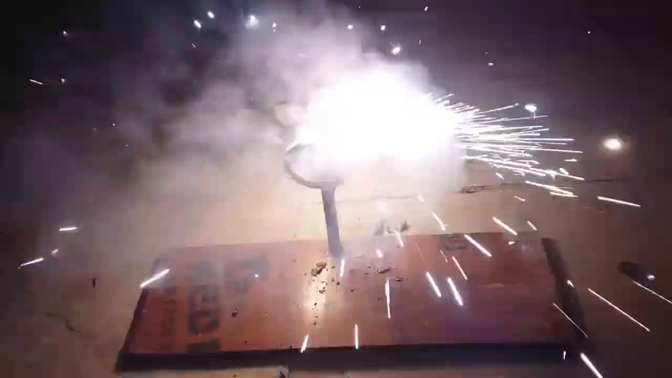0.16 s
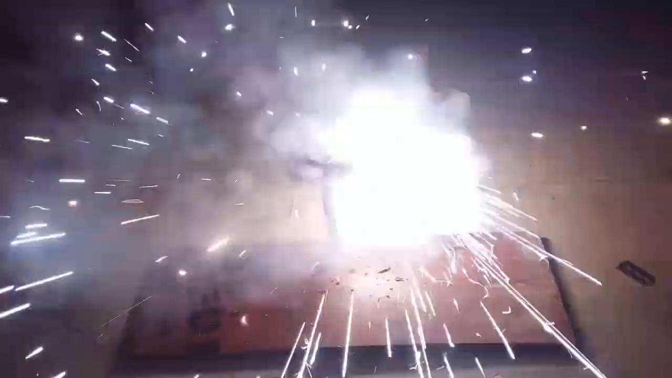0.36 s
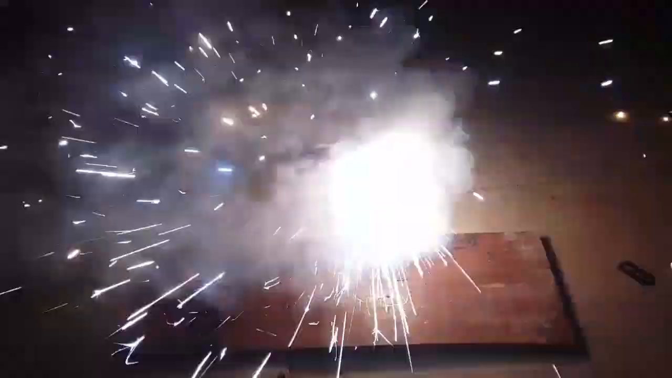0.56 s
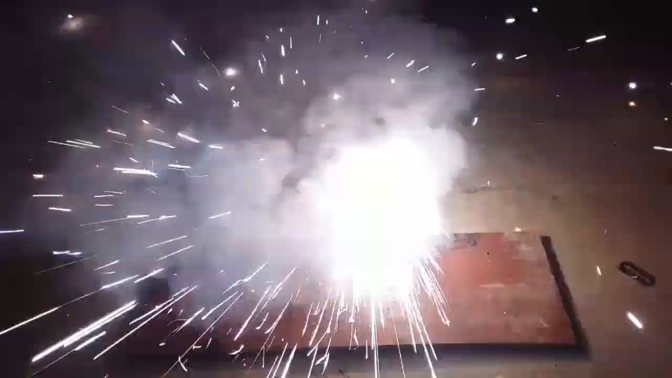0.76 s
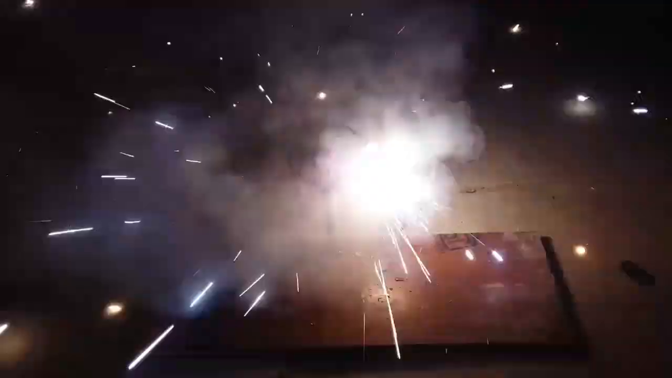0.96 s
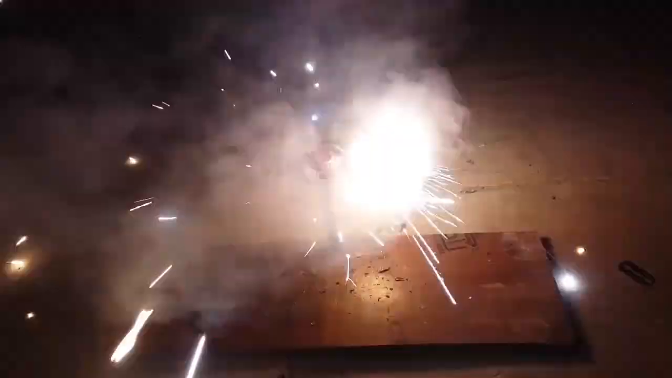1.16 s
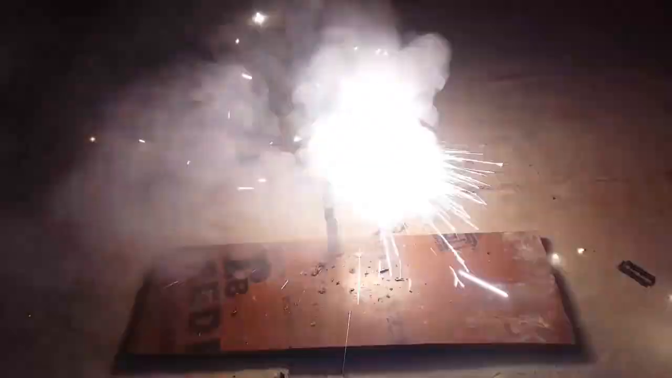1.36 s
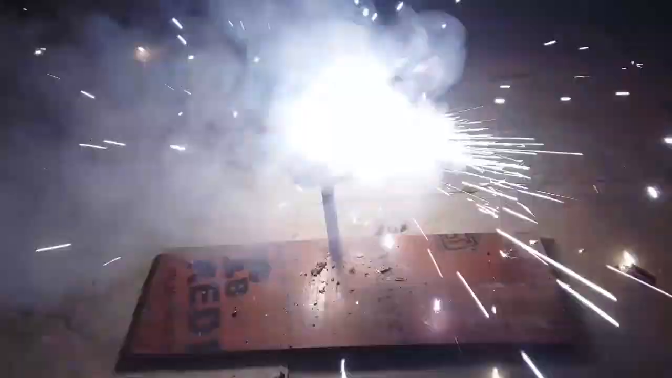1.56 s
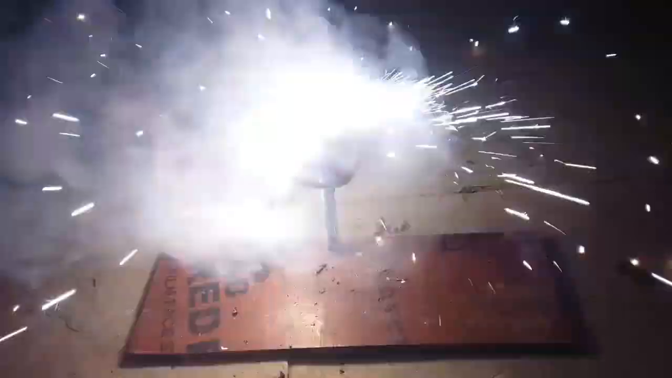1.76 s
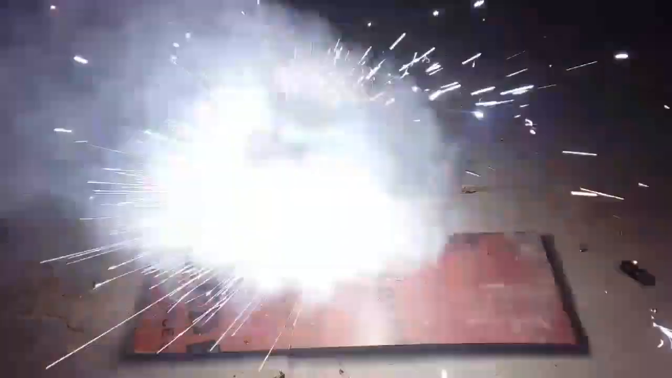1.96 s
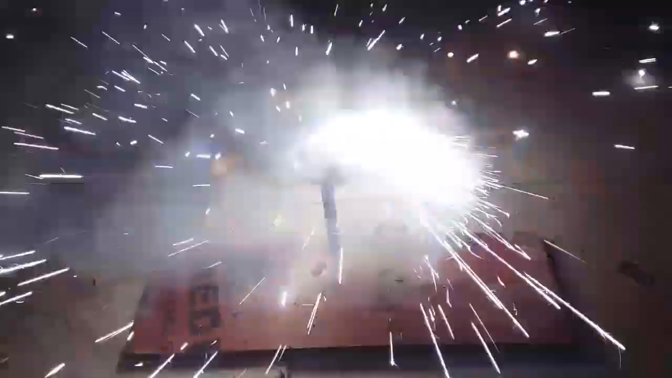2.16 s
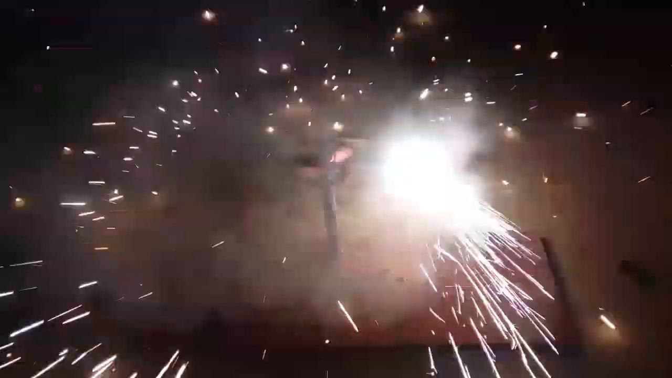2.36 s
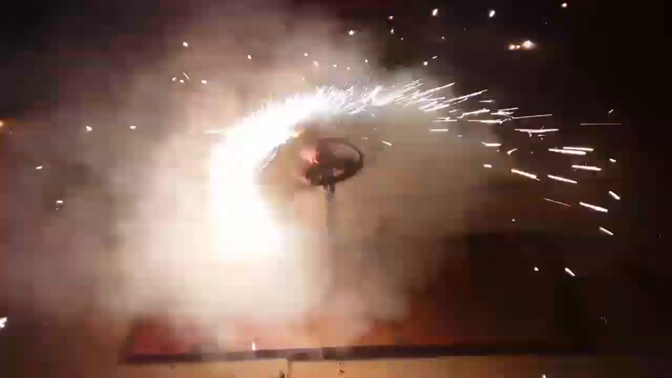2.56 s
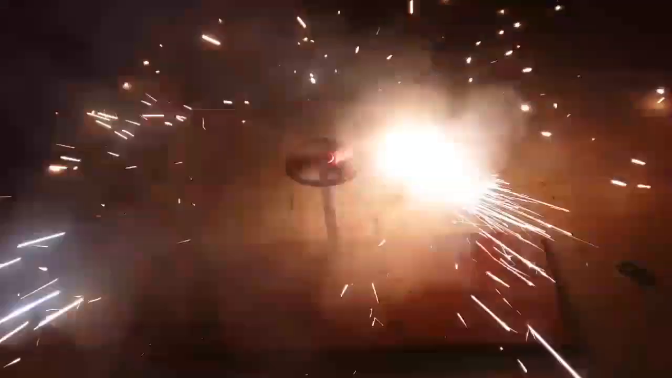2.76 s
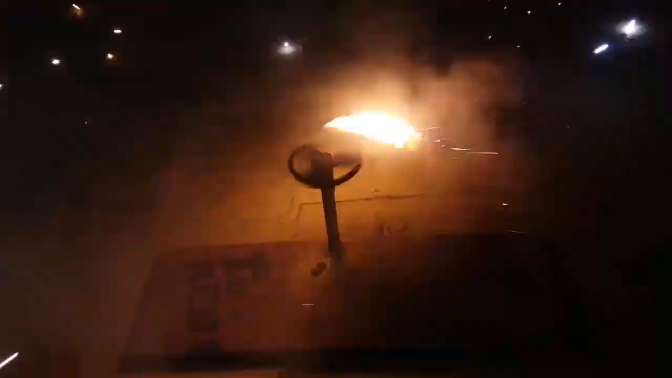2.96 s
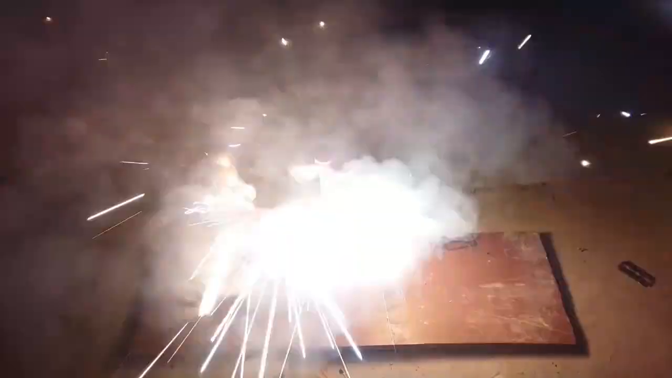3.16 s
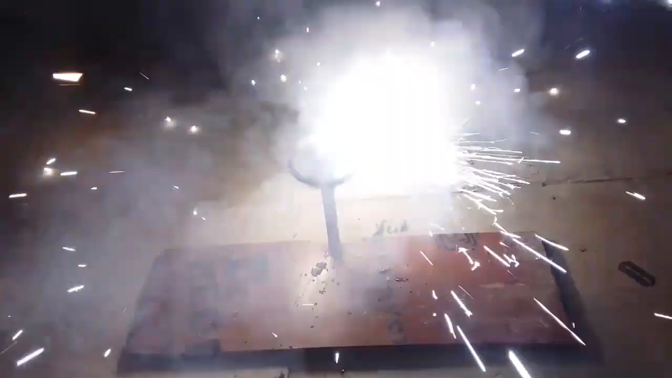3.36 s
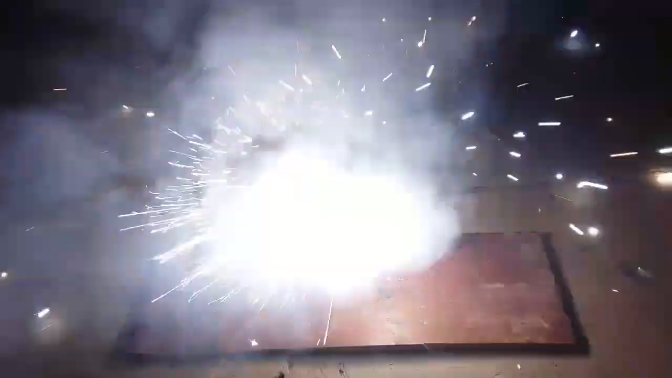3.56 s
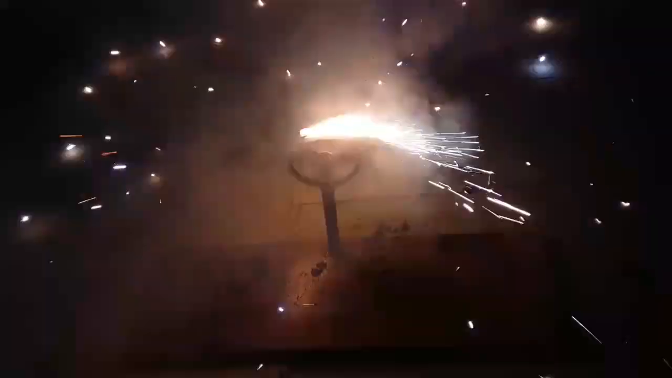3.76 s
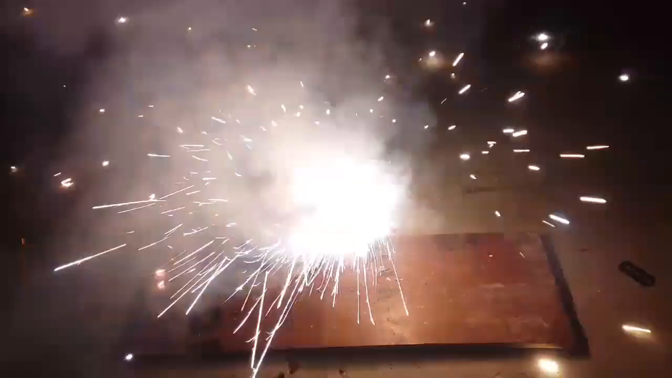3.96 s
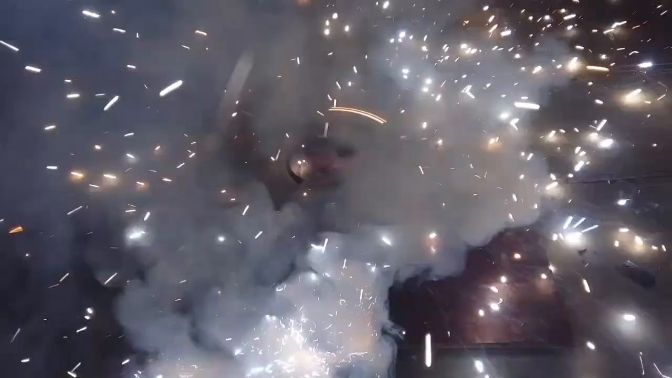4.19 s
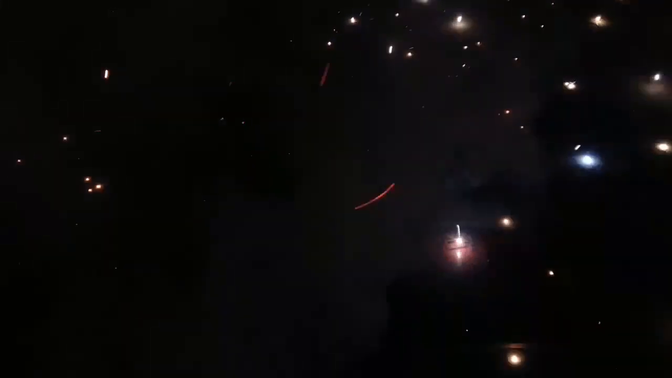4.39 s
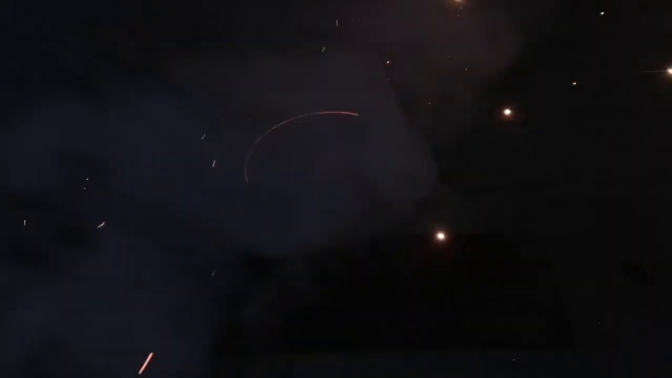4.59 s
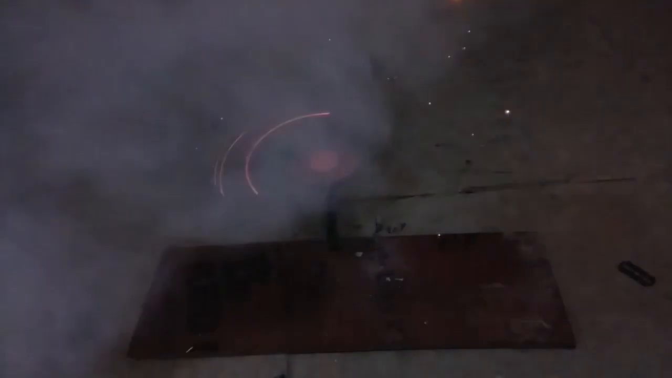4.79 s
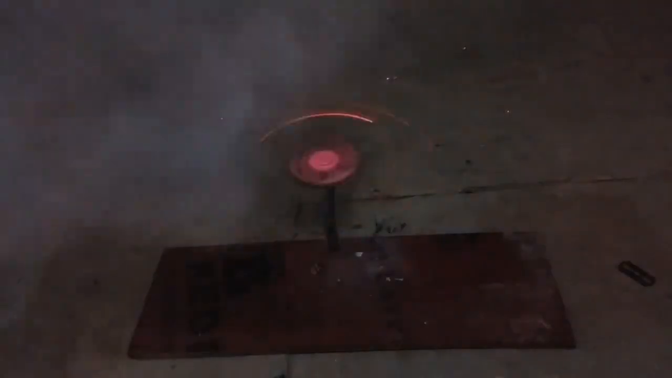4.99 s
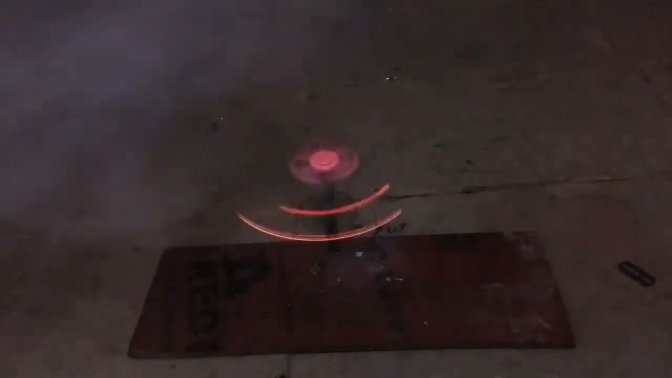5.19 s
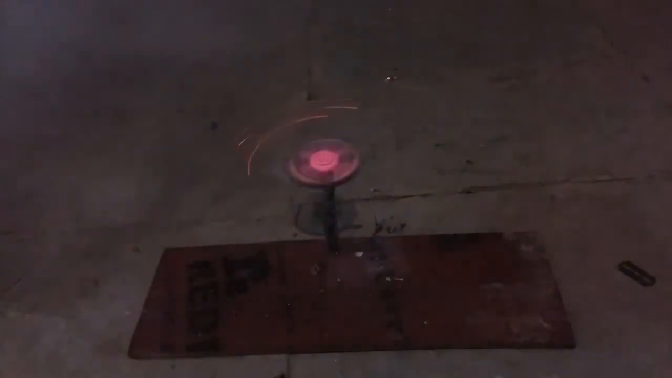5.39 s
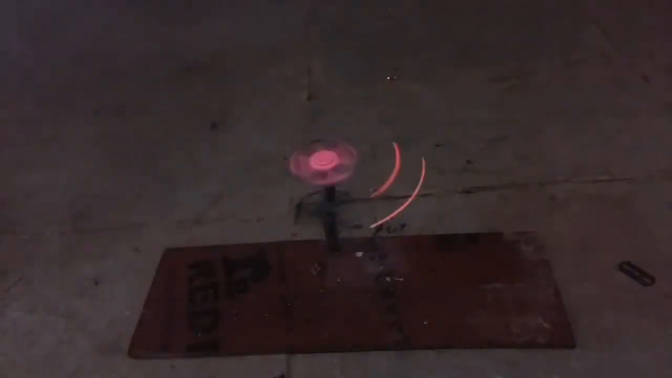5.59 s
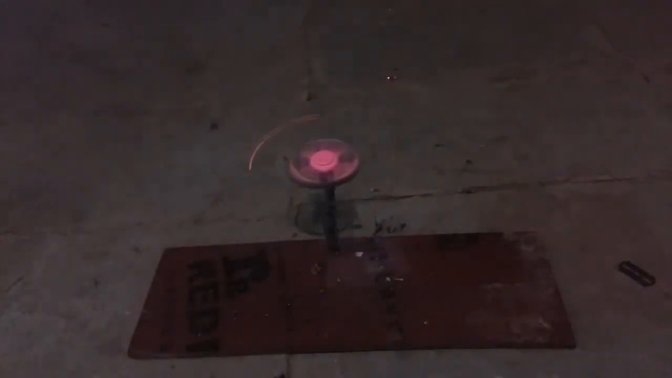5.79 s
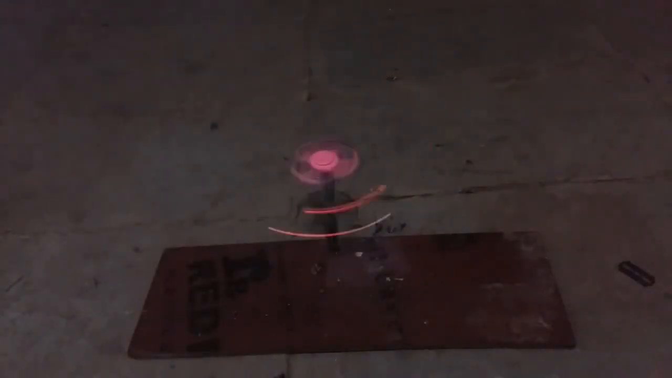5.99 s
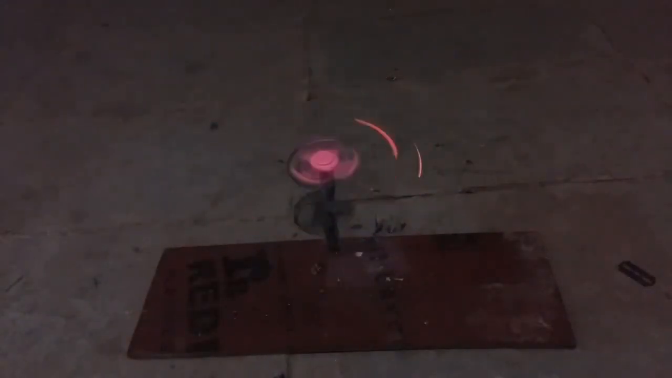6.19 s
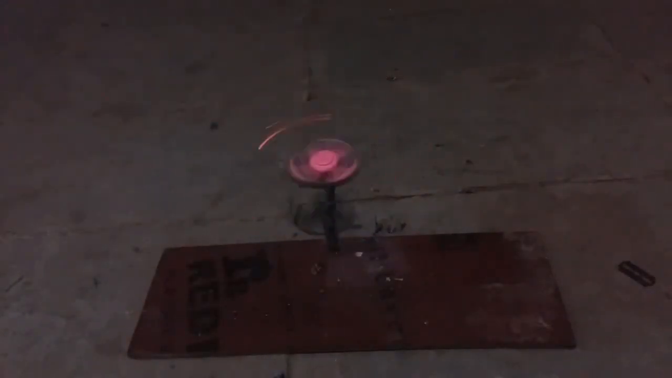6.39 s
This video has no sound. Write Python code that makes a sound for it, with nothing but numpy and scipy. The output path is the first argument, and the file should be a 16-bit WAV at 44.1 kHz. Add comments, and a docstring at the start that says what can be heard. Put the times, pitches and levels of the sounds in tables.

```python
"""A jet of fire roars and hisses, swaying left and right, as a wheel firework spins on a short post over a
board at night. The board's echo sweeps once a turn, and sparks snap as tiny bursts of bright noise. The charge
ends in a pop and a bang, made of pressure pulses and torn gas among hard walls. The wheel coasts on with a
whirr of coloured noise, and the camera's gain control slowly lifts the quiet night."""
import sys
import numpy as np
from scipy import signal
from scipy.fft import rfft, irfft, next_fast_len
from scipy.io import wavfile
from scipy.ndimage import uniform_filter1d, minimum_filter1d, map_coordinates

SR = 44100
rng = np.random.default_rng(int(sys.argv[2]) if len(sys.argv) > 2 else 0)


def inscribe(sig):
    """Save sig as 16-bit PCM at rate SR to the path in sys.argv[1].

    A 1-D sig is mono; a 2-D sig holds one channel per row.
    Samples are clipped to [-1, 1] before scaling.
    """
    pcm = np.round(np.clip(np.atleast_2d(sig).T, -1, 1) * 32767)
    wavfile.write(sys.argv[1], SR, pcm.astype(np.int16))


N = 284004


def amp(db):
    """Gain of a level in dB."""
    return 10 ** (np.asarray(db) / 20)


def unit(x):
    """Scale x to an rms of 1."""
    return x / np.sqrt(np.mean(x ** 2) + 1e-20)


def along(points, hz):
    """Read a curve of (Hz, value) points on a log frequency axis."""
    f, v = np.transpose(points)
    return np.interp(np.log(hz + 1), np.log(f + 1), v)


def curves(rows):
    """One value per sample for each column after the time."""
    s, *cols = np.transpose(rows)
    return [np.interp(np.arange(N) / SR, s, c) for c in cols]


def wobble(rate):
    """A smooth random curve with rate random knots a second."""
    knots = rng.standard_normal(int(N * rate / SR) + 4)
    return map_coordinates(knots, [np.arange(N) * rate / SR])


def filtered(x, response):
    """Filter x by a response, real or complex, that depends on frequency."""
    m = next_fast_len(N + SR // 8)
    return irfft(rfft(x, m) * response(np.fft.rfftfreq(m, 1 / SR)), m)[..., :N]


def delayed(pair, lags):
    """Read each side of a stereo pair late by its own lag in samples; a negative lag reads it early."""
    return np.array([map_coordinates(side, [np.arange(N) - lag], mode="nearest")
                     for side, lag in zip(pair, lags)])


def spread(hz, alike):
    """Weights of the shared and the opposed noise that give a wanted left-right likeness."""
    turn = np.arccos(np.clip(along(alike, hz), -1, 1)) / 2
    return np.array([np.cos(turn), np.sin(turn)])


def smooth_field(shape, bins, frames):
    """Random patches over frequency and time, averaged over some bins and frames, with rms 1."""
    field = uniform_filter1d(rng.standard_normal(shape), size=bins, axis=0)
    return unit(uniform_filter1d(field, size=frames, axis=1))


def rush(colour, patchy_db):
    """Rushing gas or air: coloured stereo noise of rms 1 with patches of random gain."""
    # How alike left and right are for near sources: hz, likeness (0 to 1)
    near_alike = [(30, .995), (170, .99), (350, .98), (700, .95), (1400, .93), (2800, .82), (5600, .68),
                  (7000, .37), (10000, .28)]
    z = signal.stft(rng.standard_normal((2, N)), nperseg=512)[2]
    patches = amp(patchy_db * smooth_field(z.shape[1:], bins=6, frames=6))
    pair = signal.istft(z * patches, nperseg=512)[1][:, :N]
    mid, side = filtered(pair, lambda hz: amp(along(colour, hz)) * spread(hz, near_alike))
    return unit(np.array([mid + side, mid - side]))


def burn():
    """One strength drives the jet: a harder burn hisses louder, roars more and sounds brighter."""
    # Fresh powder catches fast, then the burn sags: start_s, hiss_db
    burn_curve = [(0, -27.5), (.04, -25), (.2, -29), (.3, -24.5), (.66, -26.5), (.95, -27), (1.349, -31),
                  (1.41, -28), (1.5, -29.5), (1.59, -23.5), (1.88, -24.5), (2.01, -28.5), (2.12, -23),
                  (2.45, -22.5), (2.68, -25), (3.0, -23), (3.12, -32), (3.22, -28.5), (3.298, -29),
                  (3.318, -24), (3.69, -24), (3.88, -28), (3.93, -33), (4.02, -26.5), (4.05, -24),
                  (4.2, -24.5)]
    # Short spurts of the flame: middle_s, rise_db over the burn
    flares = [(.39, 1.5), (.61, 1), (.84, 2), (.92, 2), (1.1, 2), (2.94, 1.5), (3.015, 4.5), (3.168, 5.5),
              (3.25, 1.5), (3.33, 1), (4.13, 2.5)]
    # Slow level of the roar at the mean burn: start_s, level_db
    roar_level = [(0, -33), (.5, -30.5), (1.1, -31), (1.6, -32), (2.4, -27.5), (2.9, -33.5), (3.3, -30.5),
                  (3.7, -32.5), (4.2, -31)]
    flare_s = .015  # half width of a spurt
    roar_follows, bright_grows = 0.79, 0.75  # dB of roar and of extra treble per dB of burn
    bright_db = 2  # extra treble at the mean burn
    t = np.arange(N) / SR
    spurts_db = sum(db * np.exp(-((t - s) / flare_s) ** 2) for s, db in flares)
    hiss_db = curves(burn_curve)[0] + spurts_db
    surge_db = hiss_db - np.mean(np.transpose(burn_curve)[1])
    roar_db = curves(roar_level)[0] + roar_follows * surge_db
    return hiss_db, roar_db, bright_db + bright_grows * surge_db


def jet_hiss(angle, sputter, bright_db):
    """Gas hisses from the nozzle: loudest when it points this way, with a treble that flickers more."""
    # Colour of the hiss: hz, level_db per Hz
    hiss_colour = [(400, -43), (700, 0), (1000, 3.5), (1600, -1), (2100, -2.5), (2400, -3), (2800, -3.5),
                   (3300, -8), (3900, -4), (4600, -6.5), (5400, -6.5), (5900, -12.5), (6400, -18),
                   (8500, -23.5), (11000, -35), (15800, -62)]
    spurts = 3 * np.clip(wobble(90) - 1, 0, None)
    hiss = rush(hiss_colour, patchy_db=1.8) * amp(.45 * sputter + 1.3 * wobble(160) + spurts)
    beam_db = .7 * np.cos(angle + .45) + .7 * np.cos(2 * angle + 1.9)
    bright = filtered(hiss, lambda hz: 1 / (1 + (2600 / (hz + 1)) ** 3))
    body = amp(beam_db) * (hiss - bright)
    return body + amp(.4 * beam_db + bright_db + .8 * wobble(40)) * bright


def board_echo(hiss, angle):
    """The board below returns the hiss a little later and duller; the delay sweeps once a turn."""
    lag_ms = .605 + .062 * np.cos(angle + [[.6], [.45]])  # longer as the nozzle comes near
    bounce = delayed(hiss, lag_ms * SR / 1000)
    return filtered(bounce, lambda hz: .5 / (1 + (hz / 4300) ** 4))


def spark_fizz(angle, hiss_db):
    """Sparks burn out in the air: crackling treble noise that swells once a turn and follows the burn."""
    # Colour of the fizz: hz, level_db per Hz
    fizz_colour = [(5000, -28.5), (7500, -7.5), (9500, -1), (12000, -6), (15800, -11.5)]
    swing_db, follows = 6, 0.59  # swell over a turn; dB of fizz per dB of burn
    crackle = amp(2.5 * wobble(400) + 1.5 * wobble(12))
    turn_swell = np.cos(angle + .6) + 0.37 * np.cos(2 * angle + 3.2)
    crackle *= amp(swing_db * turn_swell + follows * hiss_db)
    return amp(-50.5) * unit(crackle * rush(fizz_colour, patchy_db=0.5))


def sway(flame, angle):
    """As the nozzle circles, the flame sways between the ears in both arrival time and loudness."""
    swing_us, swing_db, leftmost_turn = 46, .7, .66  # time sway, level sway, turn where it stands leftmost
    left = (.2 + np.cos(angle - 2 * np.pi * leftmost_turn)) * [[.5], [-.5]]
    return amp(swing_db * left) * delayed(flame, -left * swing_us * SR / 1e6)


def jet():
    """Uneven burning from a circling nozzle: hiss, board echo, roar, rumble and fizz near a wall."""
    # Speed of the wheel: start_s, speed in turns a second
    spin = [(0, 8.676), (.4, 8.694), (1, 10.503), (1.7, 10.56), (2.3, 11.963), (3, 13.173), (4.2, 11.684)]
    # Colour of the roar: hz, level_db per Hz
    roar_colour = [(40, -52), (100, -25), (165, 6), (210, 2.5), (280, 2.5), (550, 0), (900, -12.5),
                   (1500, -32.5)]
    # Colour of the rumble: hz, level_db per Hz
    rumble_colour = [(25, -25), (50, -14), (80, -5), (130, -0.5), (250, -31.5)]
    start_turn = -.428  # where the nozzle points at the start
    angle = 2 * np.pi * (start_turn + np.cumsum(curves(spin)[0]) / SR)
    hiss_db, roar_db, bright_db = burn()
    sputter = wobble(28)  # shared by hiss and roar
    hiss = jet_hiss(angle, sputter, bright_db)
    hiss = unit(hiss + board_echo(hiss, angle))
    roar = rush(roar_colour, patchy_db=1.62) * amp(0.5 * sputter + 0.28 * wobble(45))
    flame = amp(hiss_db) * hiss + amp(roar_db) * unit(roar)
    flame += amp(-43.5) * rush(rumble_colour, patchy_db=1.0)  # a steady rumble under the roar
    fizz = spark_fizz(angle, hiss_db)

    def near_wall(hz):
        """A copy 4.25 ms later makes peaks and dips in the bass."""
        return 1 + .5 / (1 + (hz / 1100) ** 3) * np.exp(-2j * np.pi * (hz - 50) * .00425)

    alight = np.clip((4.226 - np.arange(N) / SR) / .022, 0, 1)  # the flame goes out within 22 ms
    return alight * filtered(sway(flame, angle) + fizz, near_wall)


def sparks():
    """Burning grains snap: each is a few milliseconds of fast-dying noise."""
    # Snaps: start_s, level_db (relative)
    snaps = [(1.142, -15), (1.4755, -17), (1.8644, -48), (2.4528, -35), (2.616, -40), (3.1652, -27),
             (3.7259, -22), (4.0936, -28)]
    out, t = np.zeros((2, N + SR)), np.arange(200) / SR
    for s, db in snaps:
        noise = np.diff(rng.standard_normal((2, len(t) + 1)))  # differences favour the treble
        snap = noise * amp(-60 * t / .004)  # falls 60 dB in 4 ms
        out[:, round(s * SR):][:, :len(t)] += amp(db + 14.5) * snap
    return filtered(out[:, :N], lambda hz: 1 / (1 + 1j * hz / 3200) ** 2)


def blast():
    """The case bursts: pushes that overshoot into suction, swelling torn gas, board thuds, a deep boom."""
    # Gas tearing out of the case: start_s, length_ms, level_db
    puffs = [(4.1955, 9, -18.5), (4.2325, 7.7, 1)]
    # Pressure blows: start_s, width_ms, level_db, sign (+1 push, -1 suction), thud_db, thud_hz
    blows = [(4.2042, .6, -18, 1, -13, 250), (4.2103, .3, -22, 1, -5.5, 290),
             (4.2116, .17, -2, 1, -30, 240), (4.2182, .4, -14, 1, -22, 600), (4.2388, .5, -8, 1, 0, 190),
             (4.2423, .09, 1, 1, -30, 182), (4.2441, .04, 8, -1, -12, 190), (4.2486, .25, 2, 1, -12, 900)]
    # Colour of the torn gas: hz, level_db per Hz
    tear_colour = [(300, -10), (900, -2), (1300, -3.5), (1700, -6), (4000, -6), (6000, -7), (8000, -20),
                   (15000, -26.5)]
    # The yard's deepest resonance, rung by the bang
    boom_hz, boom_db, boom_builds_s, boom_t60_s = 84, -16, 0.035, 0.56
    first = round(4.1 * SR)
    span = slice(first, first + SR)
    t, gate, push = np.arange(first, first + SR) / SR, np.zeros(N), np.zeros(N)
    for s, ms, db in puffs:
        u = (t - s) * 1000 / ms
        gate[span] += amp(db) * np.clip(1.6 * u, 0, 1) * np.clip((1 - u) * 8, 0, 1)
    for s, ms, db, sign, thud_db, thud_hz in blows:
        since = np.clip(t - s, 0, .2)
        u = since * 1000 / ms
        push[span] += sign * amp(db) * 2 * u * (2 - u) * np.exp(-u)  # turns over at two widths
        push[span] += amp(thud_db - 60 * since / .038) * np.sin(2 * np.pi * thud_hz * since)
    since = np.clip(t - puffs[-1][0], 0, None)
    swell = amp(boom_db - 60 * since / boom_t60_s) * (1 - np.exp(-since / boom_builds_s))
    push[span] += swell * np.sin(2 * np.pi * boom_hz * since)
    return push + gate * rush(tear_colour, patchy_db=2.0)


def walls(x, colour):
    """Hard walls answer with a noisy echo tail in which each frequency dies at its own speed."""
    # Time for the echo to fall 60 dB: hz, t60_s
    wall_decay = [(70, 0.5), (200, .5), (500, 0.43), (4000, 0.49), (8000, 0.45), (14000, 0.26)]
    # How alike left and right are in the echo: hz, likeness (0 to 1)
    walls_alike = [(130, .96), (290, .86), (640, .6), (1400, .15), (3000, .05)]
    treble_builds_s, bass_builds_s = 0.036, 0.037  # treble and deepest bass gather late
    hz, t, z = signal.stft(rng.standard_normal((2, SR)), SR, nperseg=512)
    f = hz[:, None]
    z *= amp(along(colour, f) - 60 * t / along(wall_decay, f)) * spread(hz, walls_alike)[..., None]
    z *= 1 - 0.65 * np.exp(-t / treble_builds_s) / (1 + (2200 / (f + 1)) ** 4)
    z *= 1 - 0.7 * np.exp(-t / bass_builds_s) / (1 + (f / 170) ** 4)
    z *= amp(1.8 * smooth_field(z.shape[1:], bins=12, frames=3))  # uneven walls
    mid, side = signal.istft(z, SR, nperseg=512)[1]
    tail = np.array([mid + side, mid - side])
    late = np.pad(x, (250, 0))[None]  # the echo starts 250 samples late
    return signal.fftconvolve(late, tail / np.linalg.norm(tail[0]), axes=1)[:, :N]


def coasting_wheel():
    """The wheel whirrs on its axle: coloured noise with a slightly unsteady level."""
    # Level of the whirr: start_s, level_db
    coast = [(4.2, -54), (4.7, -50.5), (5.4, -54.5), (6.44, -58.5)]
    # Colour of the whirr: hz, level_db per Hz
    whirr_colour = [(700, -19), (840, -28.5), (990, -5.5), (1110, -9.5), (1225, -0.5), (1310, -12),
                    (1560, -14.5), (1670, -27), (1780, -14.5), (1910, -23), (2110, -10.5), (2500, -29),
                    (2680, -18.5), (2850, -25), (3100, -18), (3400, -27.5), (3750, -29.5), (3930, -29),
                    (4180, -25), (4700, -38), (5600, -36.5), (6200, -44), (7500, -56), (11000, -74.5)]
    return amp(curves(coast)[0] + .6 * wobble(22)) * rush(whirr_colour, patchy_db=1.0)


def night():
    """Far town noise and one thin whine; the treble and the whine rise and fall together."""
    # Colour of the far town noise: hz, level_db per Hz
    town_colour = [(25, -19.5), (85, 2), (200, -10), (400, -6.5), (540, -17.5), (650, -6), (740, -18.5),
                   (840, -22.5), (1300, -16), (1670, -26.5), (2500, -22.5), (4500, -39.5), (6500, -32),
                   (7600, -45.5), (8800, -33), (9700, -44.5), (10300, -44.5), (11500, -58.5), (13500, -53),
                   (15800, -64.5)]
    # Gain on the night's treble and whine: start_s, level_db
    treble_level = [(4.6, 1.5), (5.4, -8), (5.9, 1.5), (6.44, 0.5)]
    town = amp(-61) * rush(town_colour, patchy_db=1.2)
    treble = filtered(town, lambda hz: 1 / (1 + (4300 / (hz + 1)) ** 8))
    whine = amp(-86 + 1.2 * wobble(14)) * np.sin(2 * np.pi * 12107 * np.arange(N) / SR)
    return town - treble + amp(curves(treble_level)[0]) * (treble + whine)


def scene():
    """Firework, walls, wheel and night, heard by two ports; the left one is a little nearer."""
    # Colour of the walls' answer to the fire: hz, level_db
    wall_colour = [(30, -16), (300, 0), (5000, 4), (15000, -2.5)]
    # Colour of the bang as the walls return it: hz, level_db
    bang_colour = [(30, -26), (80, 4.5), (150, 5), (230, 0), (300, -3), (560, 2), (820, -5.5), (1030, -4.5),
                   (1330, -6.5), (1600, -3.5), (3270, -15), (4840, -10), (6000, -15.5), (7000, -22),
                   (15000, -33)]
    # The left port hears more treble: hz, left-right difference_db
    lean = [(60, .9), (380, .8), (700, 1.5), (1300, .6), (2400, .4), (4400, 3.2), (8000, 1.8), (15000, 2.4)]
    fire = jet() + sparks()
    shock = np.zeros(N)
    shock[round(4.2355 * SR)] = 1  # the walls hear the bang as one sharp front
    answer = amp(-14) * walls(fire.mean(0), wall_colour)
    answer += amp(22.0) * walls(shock, bang_colour)
    sides = np.array([[1], [-1]])

    def ports(hz):
        """Share the level difference between the sides and let the left lead by one sample."""
        return amp(along(lean, hz) / 2 * sides) * np.exp(1j * np.pi * hz / SR * sides)

    return filtered(fire + blast() + answer + coasting_wheel() + night(), ports)


def record(dry):
    """Gain control lifts long quiet; a limiter that looks ahead ducks the bang; the top clips; the band ends."""
    top_hz = 15900
    t = np.arange(N) / SR
    power = uniform_filter1d(np.mean(dry ** 2, 0), size=400)
    level_db = 10 * np.log10(np.abs(power) + 1e-12)
    quiet_s = t - np.maximum.accumulate(np.where(level_db > -40, t, 0))  # time since it was last loud
    lift_db = 15 * (1 - np.exp(-(np.clip(quiet_s - .95, 0, None) / 0.31) ** 1.47))
    # The window reaches forward, so ducking starts before the peak
    over_db = -minimum_filter1d(-np.clip(level_db + 3.5, 0, None), size=501, origin=-250)
    duck_db = np.maximum.accumulate(over_db + 70 * t) - 70 * t  # lets go at 70 dB a second
    x = dry * amp(lift_db - uniform_filter1d(duck_db, size=300))
    x = x / (1 + np.abs(x / 0.93) ** 6) ** (1 / 6)  # rounded clipping

    def band(hz):
        """The microphone drops the deepest bass; the treble stops at the top."""
        return (1j * hz / (30 + 1j * hz)) ** 4 * np.clip((top_hz - hz) / 150, 0, 1)

    return filtered(x, band)


dry = scene()
out = record(dry)
inscribe(out)
```